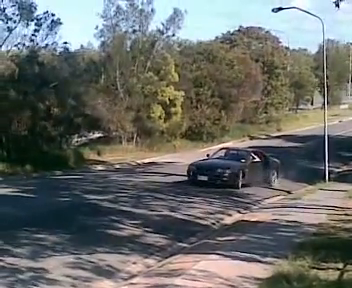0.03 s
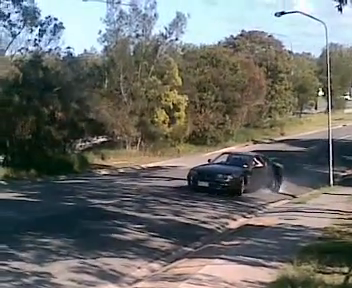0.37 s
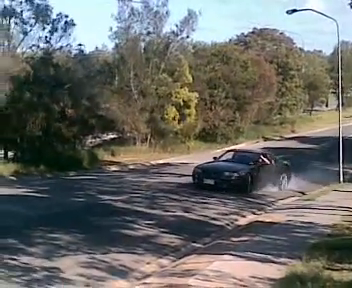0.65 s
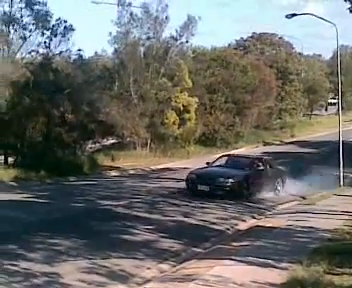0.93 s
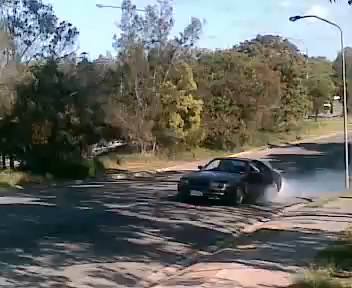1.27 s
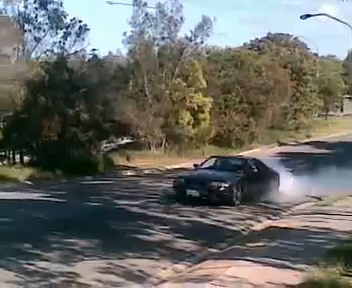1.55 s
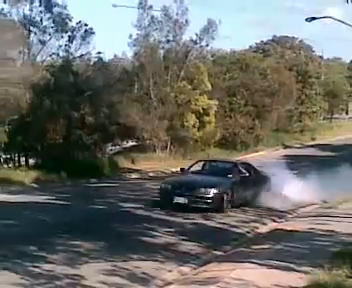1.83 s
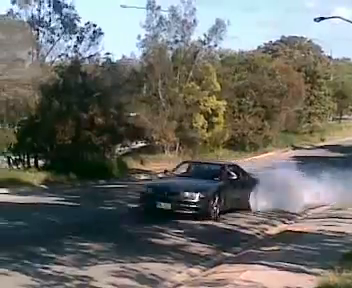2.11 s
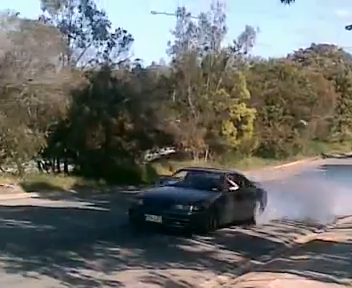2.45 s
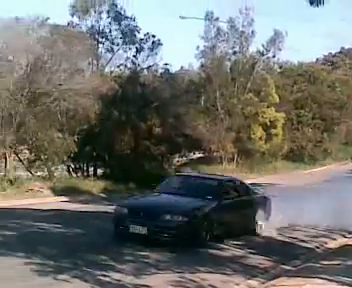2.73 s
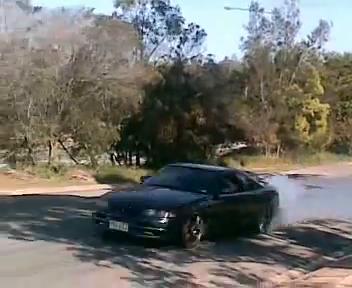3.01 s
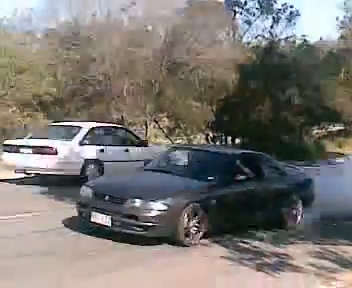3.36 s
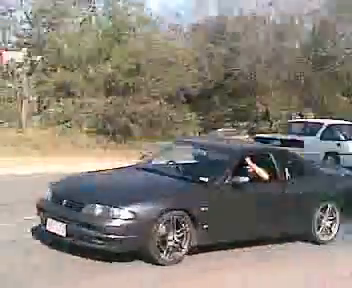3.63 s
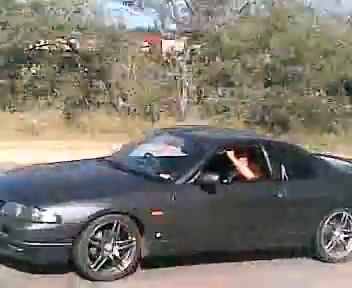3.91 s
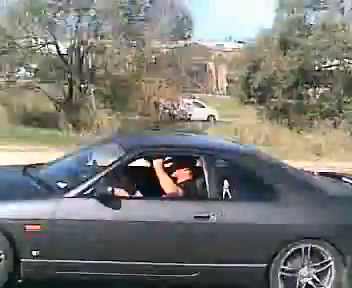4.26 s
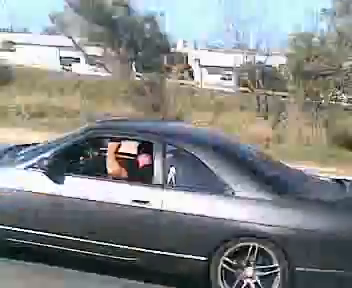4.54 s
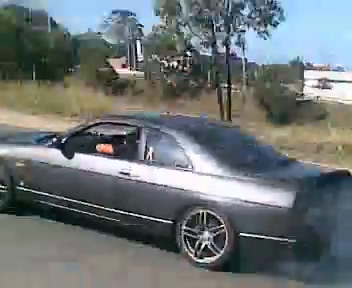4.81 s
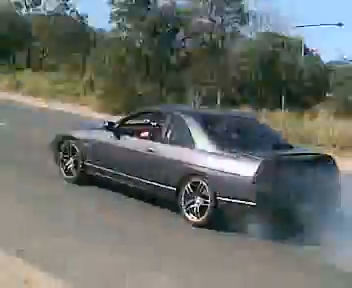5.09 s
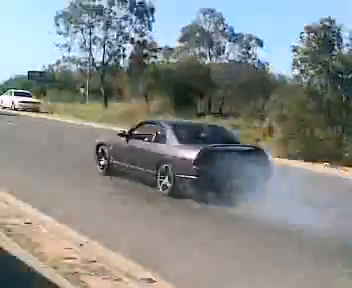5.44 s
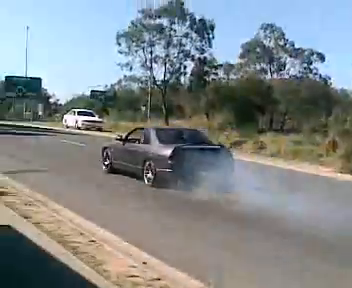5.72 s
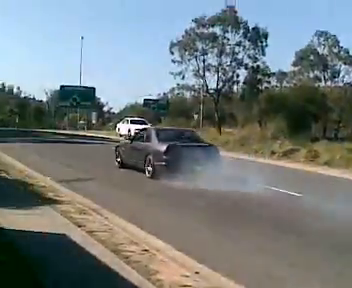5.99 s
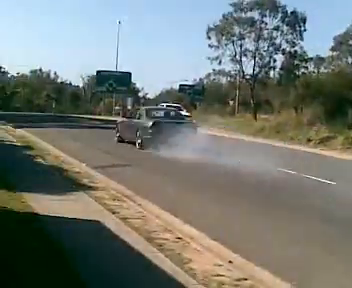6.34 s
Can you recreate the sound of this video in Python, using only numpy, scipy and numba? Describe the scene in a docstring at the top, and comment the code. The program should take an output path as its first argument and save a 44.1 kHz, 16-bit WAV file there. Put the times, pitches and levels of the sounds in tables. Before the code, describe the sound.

A car does a burnout, rasping against its rev limiter, then approaches on squealing tyres, blasts past the microphone and coasts away.

```python
"""A tree-lined road, microphone at the kerb. Some way off, a six-cylinder coupe does a burnout: the
exhaust rasps through its pipe and bangs on the rev limiter while the slipping tyres scrub and ring.
The driver lifts and the turbo vents; then the car pulls up to the microphone on squealing tyres.
From 4 s the turbulent blast of the tailpipe buffets and overloads the microphone as the car passes.
At 5.6 s the driver lifts again, the turbo vents once more, and the car coasts away with falling revs."""
import sys
import numpy as np
from scipy import signal
from scipy.fft import rfft, irfft
from scipy.io import wavfile
from scipy.ndimage import map_coordinates
from numba import njit

SR = 44100
rng = np.random.default_rng(int(sys.argv[2]) if len(sys.argv) > 2 else 0)


def store_pcm(level_fs):
    """Save levels as 16-bit WAV."""
    pcm = np.round(np.clip(level_fs, -1, 1) * 32767).astype(np.int16)
    wavfile.write(sys.argv[1], SR, np.atleast_2d(pcm).T)


N = 289296
T = np.arange(N) / SR
LIFT_OFF_S = 5.56

# Loudness of engine and tyre scrub: swells on the approach, ducks under the blast, returns, fades.
# Each row: time in seconds, apparent distance in metres.
APPARENT_DISTANCE = [(0, 16.5), (1.8, 18.1), (2.5, 17.8), (2.95, 12.9), (3.5, 7.4), (3.95, 5.4), (4.6, 17),
                     (5.4, 10.5), (5.85, 6.3), (6.56, 27)]
# Rubber scrubbing on asphalt. Each row: frequency in Hz, relative spectral level in dB.
SCRUB_SPECTRUM = [(25, -23), (70, -11.5), (170, -15), (420, -6.5), (700, -5), (950, -7.5), (1400, -4),
                  (2500, -8), (5000, -10.5), (7500, -27)]
# Bands in which the spinning tyres ring. Each row: centre in Hz, nominal width in Hz, relative gain in dB.
TREAD_BANDS = [(1346, 70, -1), (1720, 170, -4.5), (1810, 59, -9.5), (2870, 71, -7.5), (3680, 80, -4.5),
               (4244, 210, 2.5)]
# Strength of that ringing. Each row: time in seconds, level in dB.
TREAD_RING_LEVEL = [(0, -34), (.45, -36.5), (1.2, -33), (1.78, -28), (1.89, -46), (1.95, -36.5),
                    (2.07, -35), (2.14, -68), (2.34, -50), (2.38, -30), (2.6, -26.5), (2.9, -28),
                    (3.3, -34), (3.6, -29), (5.5, -31.5), (5.7, -56)]
# Tyre squeals. Each row: start and end in seconds, first and last pitch in Hz, level in dB,
# wobble as a share of the pitch.
TYRE_SQUEALS = [(0, 0.096, 1720, 1700, -27, 0.019), (1.845, 1.864, 760, 740, -33, 0.017),
                (1.897, 1.92, 620, 608, -25.5, 0.021), (2.36, 2.972, 1394, 1357, -27, .012),
                (2.7, 3.05, 2890, 2944, -30.5, .012), (2.8, 3.026, 1313, 1288, -21, 0.0118),
                (2.9, 3.353, 1630, 1670, -23.5, .018), (3.06, 3.622, 2294, 2335, -23, .025),
                (3.05, 3.33, 4250, 4290, -23.5, .019), (2.74, 3.321, 884, 920, -24.5, .05),
                (3.298, 4.137, 1450, 1494, -28, 0.0253), (3.5, 3.994, 5610, 6100, -32, .025),
                (5.54, 5.61, 2200, 1900, -33, 0.019), (5.6, 5.68, 1305, 1270, -29, .015),
                (5.715, 5.754, 828, 820, -28, 0.045), (5.71, 5.85, 2640, 2137, -35, 0.043)]
# The turbo vents after each lift. Each row: start, hold and decay in seconds, level in dB.
TURBO_VENTS = [(1.92, 0.13, 0.051, -26.5), (5.702, 0.017, 0.27, -25)]
# Hiss of the escaping boost. Each row: frequency in Hz, relative spectral level in dB.
VENT_SPECTRUM = [(200, -8), (700, -2.5), (1400, 4.5), (2400, 3.5), (3150, -4), (4300, -5.5), (6000, -3.5),
                 (7500, -2)]
# Presses of the throttle. Each row: start and end in seconds, opening 0-1, roughness of the rasp 0-1.
THROTTLE_PRESSES = [(-1, 1.81, 1, .88), (2.16, 2.35, .28, .5), (2.358, 5.57, 1, .62)]
# Engine speed until it coasts. Each row: time in seconds, four-stroke cycles per second.
ENGINE_SPEED = [(0, 60.5), (1.77, 60.7), (1.87, 56.5), (2.15, 52.0), (2.33, 59.4), (2.4, 55.6),
                (2.52, 53.5), (2.68, 55.2), (2.92, 60.4), (3.26, 60.3), (3.36, 58.3), (3.8, 57.8),
                (4.15, 60.0), (5.3, 56.0), (5.62, 53.6)]
# Rev limiter. Each row: relight time and length of the cut before it in seconds, bang in relative dB.
IGNITION_CUTS = [(0.254, 0.036, -17.5), (0.39, 0.11, -51), (0.458, 0.055, -15), (0.567, 0.0088, -19),
                 (0.613, 0.011, -22), (0.712, 0.03, -21), (0.782, 0.018, -19.5), (0.854, 0.051, -18),
                 (0.94, 0.024, -27), (0.997, 0.011, -30), (1.103, 0.037, -16.5), (1.159, 0.028, -21),
                 (1.249, 0.038, -20.5), (1.363, 0.0088, -18), (1.491, 0.032, -13), (1.574, 0.04, -14.5),
                 (1.664, 0.022, -18), (1.732, 0.037, -15.5), (1.811, 0.024, -22), (2.364, 0.015, -12),
                 (2.911, 0.016, -26), (3.046, 0.01, -17), (3.152, 0.011, -12.5), (3.25, 0.0086, -13),
                 (3.322, 0.021, -13.5)]
# Tailpipe thumps and outdoor rumble. Each row: frequency in Hz, relative spectral level in dB.
THUMP_SPECTRUM = [(25, -24), (72, 3), (110, -3.5), (190, 3), (280, -4), (450, -17), (1200, -6),
                  (4000, -50.5)]
# Orders that swell and fade as the car coasts away. Each row: multiple of the cycle rate,
# peak time and half width in seconds, level in dB.
COASTING_ORDERS = [(2, 5.8, 0.72, -45), (4, 6.22, 0.71, -45), (6, 5.64, 0.25, -31), (6, 6.22, 0.48, -51),
                   (8, 5.69, 0.16, -35), (10, 5.88, 0.24, -42.5), (10, 6.32, .12, -51), (12, 5.7, .13, -42),
                   (12, 6.17, 0.16, -42)]
# Orders around the firing tones, under load. Each row: multiple of the cycle rate, relative level in dB.
UNEVEN_ORDERS = [(2, -3.5), (3, -1), (4, 0), (5, -3.5), (7, -3.5), (8, -2.5), (9, -2.5), (10, -0.5),
                 (11, -11), (13, -8), (14, -2.5), (15, -0.5), (16, 0.5), (17, 2), (18, 2.5), (20, -0.5),
                 (22, -2.5), (24, 9), (25, -3.5), (26, 7), (28, 3.5), (30, 0), (34, -0.5)]
# Low pipe resonances where those orders drone. Each row: centre in Hz, half width in Hz, boost in dB.
PIPE_DRONES = [(159.2, 10, 10), (214, 13, 6), (600, 14, 7)]
# Silencer resonances where the firing tones boom. Each row: centre in Hz, half width in Hz, boost in dB.
SILENCER_BOOMS = [(352.6, 22.7, 8), (652.7, 30.7, 15), (702, 31, 12)]
# Bands that the silencer cancels. Each row: centre in Hz, width in Hz, gain in dB.
SILENCER_NULLS = [(453, 120, -16), (880, 230, -11.5), (2124, 97, -4)]
# Exhaust and body resonances. Each row: centre in Hz, width in Hz, relative gain in dB.
PIPE_MODES = [(579, 70, 8), (742, 59, 10), (1060, 55, 9.5), (1364, 170, 8.5), (1700, 172, 8.5),
              (2223, 114, 3), (2830, 350, -4.5), (3776, 290, -6), (4287, 300, -2.5), (5390, 2070, -8.5),
              (7120, 510, -8.5)]
# Cylinders in firing order. Each row: relative pulse level in dB, lateness as a share of the cycle.
CYLINDER_PULSES = [(-9.5, -0.0033), (-14, 0.0014), (-5, -0.008), (-9.5, -0.00026), (-11.5, -0.0065),
                   (-10.5, .002)]
# The body shades the treble as the car turns side-on. Each row: time in seconds, treble gain in dB.
RASP_TREBLE = [(0, 1.5), (1.7, 3), (2.7, 13.5), (3.2, 13), (3.9, 13.5), (5.6, 10), (6.56, -6)]
# Blast while the tailpipe faces the microphone. Each row: time in seconds, level in dB, centre in Hz.
BLAST_CURVE = [(4.0, -3.5, 1505), (5.05, -2, 1974), (5.5, -3.5, 1740)]
# Rumble within the blast. Each row: frequency in Hz, relative spectral level in dB.
RUMBLE_SPECTRUM = [(20, -2), (60, -5), (150, -4), (400, -4), (900, -4), (3000, -21)]
# Buffets of exhaust gas on the microphone. Each row: time in seconds, drop of the blast in octaves,
# push on the diaphragm 0-1.
GAS_BUFFETS = [(4.039, 1.98, 0), (4.204, 1.4, 0.2), (4.494, 2.2, 0.1), (4.642, 2.1, 0.65), (4.662, 2, 0.2),
               (4.8, 0.55, 0.35), (4.846, 0.97, 0), (4.921, 2.0, 0.82), (4.936, 0.12, 1), (5.053, 1.8, 0.1),
               (5.066, 3.1, 0.88), (5.252, 2.7, 0.43), (5.315, 0.15, 0.44), (5.331, 1.9, 0),
               (5.388, 2.72, 0.11), (5.429, 1.62, 0.06), (5.521, 0.78, 0.2), (5.538, 2.3, 0.16),
               (5.551, 2.4, 0), (5.566, 2.2, 0.33)]


def from_db(db):
    """Decibels to gain."""
    return 10 ** (np.asarray(db) / 20)


def rms_one(x):
    """Scale to unit rms."""
    return x / np.sqrt(np.mean(x ** 2) + 1e-20)


def in_time(rows):
    """Each column of a curve, at every sample."""
    times, *columns = np.transpose(rows)
    return [np.interp(T, times, column) for column in columns]


def gate(start, end, attack_s, release_s):
    """Envelope 0-1: attack from start, hold, release from end."""
    attack = 1 - np.exp(-np.maximum(T - start, 0) / attack_s)
    return attack * np.exp(-np.maximum(T - end, 0) / release_s)


def bell(x, centre, half_width):
    """Smooth hump of height 1."""
    return np.exp(-((x - centre) / half_width) ** 2)


def butter(x, hz, kind, order=2):
    """Causal low- or high-pass."""
    return signal.sosfilt(signal.butter(order, hz, kind, fs=SR, output="sos"), x)


def drift(rate):
    """Smooth random curve of rms 1, changing about rate times a second."""
    knots = rng.standard_normal(4000)
    coarse = T[::8]
    curve = map_coordinates(knots, [coarse * rate + 5], order=3, mode="wrap")
    return rms_one(np.interp(T, coarse, curve))


def noise(spectrum):
    """Noise with a given spectrum, rms 1."""
    hz, db = np.transpose(spectrum)
    bins = np.maximum(np.fft.rfftfreq(N, 1 / SR), 1)
    gain = from_db(np.interp(np.log(bins), np.log(hz), db))
    return rms_one(irfft(rfft(rng.standard_normal(N)) * gain, N))


def resonance(x, hz, width):
    """Two-pole resonance with gain 1 at its peak."""
    r = np.exp(-np.pi * width / SR)
    feedback = [1, -2 * r * np.cos(2 * np.pi * hz / SR), r * r]
    return signal.lfilter(np.array([1, 0, -1]) * (1 - r * r) / 2, feedback, x)


@njit
def moving_resonance(x, step, damping):
    """State-variable band-pass whose centre moves at every sample."""
    out, low, band = np.zeros(len(x)), 0., 0.
    for i in range(len(x)):
        low += step[i] * band
        band += step[i] * (x[i] - low - damping * band)
        out[i] = band
    return out


def order_tone(order, cycles, stumble):
    """A sine of rms 1 at a multiple of the cycle rate, its timing scattered by stumble cycles."""
    ragged = cycles + stumble * drift(70)
    return np.sqrt(2) * np.sin(2 * np.pi * (order * ragged + rng.random()))


def roadside_echo(x, echo_db=-5.0, t60_s=0.085):
    """Kerb, car body and trees add a short diffuse echo to the direct sound."""
    t = T[:SR // 2]
    echo = rng.standard_normal(len(t)) * from_db(-60 * t / t60_s) * (t > .002)
    return x + from_db(echo_db) * signal.fftconvolve(x, echo / np.linalg.norm(echo))[:N]


def rumble_and_thumps(bangs, load, thump_db=-13.0, load_db=-41.5, background_db=-46.0):
    """Over a faint, steady outdoor rumble, the tailpipe rumbles under load and thumps at each bang."""
    envelope = from_db(thump_db) * bangs ** 0.65 + from_db(load_db) * load + from_db(background_db)
    return envelope * noise(THUMP_SPECTRUM)


def tyre_scrub(near_db, shut, spinning_db=-31.5, rolling_change_db=-12.5):
    """Rubber scrubs on asphalt, louder as the car seems nearer and softer when merely rolling."""
    level_db = spinning_db + near_db + rolling_change_db * shut
    return from_db(level_db + 1.1 * drift(25)) * noise(SCRUB_SPECTRUM)


def tread_ring(firing, judder_db=3.0):
    """Slipping rubber rings in narrow bands, judders, and slackens in each ignition cut."""
    rings = np.zeros(N)
    for hz, width, db in TREAD_BANDS:
        band = resonance(rng.standard_normal(N), hz, 2 * width)
        rings += from_db(db) * rms_one(resonance(band, hz, 2 * width))
    level_db = in_time(TREAD_RING_LEVEL)[0] + judder_db * drift(60)
    return from_db(level_db) * firing ** 0.57 * rms_one(rings)


def tyre_squeals(firing, flutter_db=3.0, overtone_db=-15.0):
    """Sticking and slipping tread squeals at an unsteady pitch and dips in each ignition cut."""
    out = np.zeros(N)
    for start, end, first_hz, last_hz, db, wobble in TYRE_SQUEALS:
        glide_hz = np.interp(T, [start, end], [first_hz, last_hz])
        hz = glide_hz * (1 + wobble * (drift(330) + 0.21 * drift(10)))
        phase = 2 * np.pi * np.cumsum(hz) / SR
        tone = np.sin(phase) + from_db(overtone_db) * np.sin(2 * phase)
        swell = gate(start, end, attack_s=min(0.04, (end - start) / 4), release_s=0.01)
        out += from_db(db + flutter_db * drift(70)) * swell * firing * tone
    return out


def turbo_vent(attack_s=0.0035):
    """Trapped boost hisses out and dies away."""
    envelope = sum(from_db(db) * gate(start, start + hold_s, attack_s, decay_s)
                   for start, hold_s, decay_s, db in TURBO_VENTS)
    return envelope * noise(VENT_SPECTRUM)


def pedal(start, end):
    """One press of the throttle, easing open and shut."""
    return gate(start, end, attack_s=0.041, release_s=0.055)


def throttle(turbo_lag_s=0.12, coasting_rough=0.99):
    """How far the throttle is shut, how much boost the lagging turbo lacks, and roughness; all 0-1."""
    opening, rough = 0, coasting_rough
    for start, end, amount, press_rough in THROTTLE_PRESSES:
        pressed = pedal(start, end)
        opening += amount * pressed
        rough += (press_rough - coasting_rough) * pressed
    shut = 1 - np.clip(opening, 0, 1)
    no_boost = butter(shut, 1 / (2 * np.pi * turbo_lag_s), "low", order=1)
    return shut, no_boost, np.clip(rough, 0, 1)


def rev_limiter(cut_db=-12.5, bangs_db=-10.5, bang_hold_s=.013):
    """Firing strength, which sags in each cut, and the envelope of the unburnt fuel banging after it."""
    cut, bangs = np.zeros(N), np.zeros(N)
    for relight, length_s, db in IGNITION_CUTS:
        cut += gate(relight - length_s, relight, attack_s=0.012, release_s=.005)
        bang = gate(relight, relight + bang_hold_s, attack_s=.003, release_s=.01)
        bangs += from_db(bangs_db + db) * bang
    return from_db(cut_db * cut), bangs


def crank(firing, unsteady=.0015, sag=.012, coast_down_s=2.17):
    """Cycle rate and cycles turned; the crank lags in each ignition cut and runs down at the end."""
    run_down = np.exp(-np.maximum(T - ENGINE_SPEED[-1][0], 0) / coast_down_s)
    cycle_hz = in_time(ENGINE_SPEED)[0] * run_down
    starved = butter(1 - firing, 6, "low", order=1)
    cycles = np.cumsum(cycle_hz * (1 + unsteady * drift(30) - sag * starved)) / SR
    return cycle_hz, cycles


def coasting_note(cycles, flutter_db=2.5):
    """Off the throttle the engine burbles; as the car recedes, a few orders stand out at a time, each swelling
    and fading in turn."""
    out = np.zeros(N)
    for order, peak_s, half_width_s, db in COASTING_ORDERS:
        swell = from_db(db + flutter_db * drift(55)) * bell(T, peak_s, half_width_s)
        out += swell * order_tone(order, cycles, stumble=0.0063)
    return out * (T > LIFT_OFF_S)


def exhaust_note(cycles, cycle_hz, firing, near_db, shut, uneven_db=-39.0, shut_db=-9.5):
    """Six firings a cycle give a tone and its octave; uneven cylinders put other orders around them."""
    def boost_db(order, resonances):
        return sum(db * bell(order * cycle_hz, hz, half_width) for hz, half_width, db in resonances)
    stumble = .003 + .012 * shut
    firing_order = len(CYLINDER_PULSES)
    firing_db = -35.0
    octave_db = -38.5 - 13 * bell(T, 3.78, 0.051)  # fades briefly on the approach
    out = np.zeros(N)
    # The firing tones and the high orders grow fastest as the car seems nearer.
    for order, db in (firing_order, firing_db), (2 * firing_order, octave_db):
        boom_db = (1 - 0.25 * shut) * boost_db(order, SILENCER_BOOMS)
        flutter_db = 1.1 * drift(40)
        out += from_db(db + boom_db + 1.6 * near_db + flutter_db) * order_tone(order, cycles, stumble)
    for order, db in UNEVEN_ORDERS:
        level_db = uneven_db + db + boost_db(order, PIPE_DRONES) + (1 + 0.041 * order) * near_db
        burble_db = 3.0 * drift(9) + 2.5 * drift(60)
        out += from_db(level_db + burble_db) * order_tone(order, cycles, stumble)
    return out * pedal(-1, LIFT_OFF_S) * firing ** 0.6 * from_db(shut_db * shut)


def exhaust_pipe(x):
    """The silencer cancels some bands, then pipe and body ring; rms 1."""
    for hz, width, db in SILENCER_NULLS:
        x = x - (1 - from_db(db)) * resonance(x, hz, width)
    return rms_one(sum((-1) ** k * from_db(db) * resonance(x, hz, width)
                       for k, (hz, width, db) in enumerate(PIPE_MODES)))


def pressure_fronts(cycles, jitter_s=.00017, scatter_db=3.0, max_cycles=450):
    """Each cylinder sends out one sharp front a cycle, scattered in timing and strength."""
    fronts = np.zeros(N)
    for k, (pulse_db, late) in enumerate(CYLINDER_PULSES):
        timing, strength = rng.standard_normal((max_cycles, 2)).T
        due = np.arange(max_cycles) + k / len(CYLINDER_PULSES) + late
        at = np.interp(due, cycles, np.arange(N)) + jitter_s * SR * timing
        heard = (at > 0) & (at < N - 100)
        fronts[at[heard].astype(int)] += from_db(pulse_db + scatter_db * strength[heard])
    return butter(butter(fronts, 1020, "high", order=4), 2300, "low", order=1)


def exhaust_rasp(cycles, firing, bangs, near_db, shut, no_boost, rough,
                 base_db=-22, shut_db=-12.5, no_boost_db=-12.5, treble_shut_db=-2):
    """Each firing sends a front and a puff of turbulence down the pipe; bangs add bursts of gas noise."""
    fronts = exhaust_pipe(pressure_fronts(cycles))
    phase = 2 * np.pi * cycles
    puffing = 1 + 0.25 * np.cos(len(CYLINDER_PULSES) * phase) + 0.17 * np.cos(phase)
    gas = exhaust_pipe(rng.standard_normal(N) * puffing)
    level_db = base_db + near_db + shut_db * shut + no_boost_db * no_boost + drift(45)
    blend = np.sqrt(1 - rough ** 2) * fronts + rough * gas
    rasp = from_db(level_db) * firing * blend + bangs * gas
    dull = butter(rasp, 7000, "low", order=1)
    treble_db = in_time(RASP_TREBLE)[0] + treble_shut_db * shut
    return dull + from_db(treble_db) * (rasp - dull)


def exhaust_blast(start_s=3.982, wander_octaves=.2, damping=0.6, buffet_db_per_octave=3.5,
                  hiss_db=-22.5, rumble_db=-1.0, lull_db=-29):
    """Turbulent roar straight at the microphone, with shreds of hiss; buffets drag it lower and louder."""
    level_db, centre_hz = in_time(BLAST_CURVE)
    # Each buffet builds more slowly than it lets go.
    drop = np.max([octaves * bell(T, peak_s, np.where(T < peak_s, 0.0095, 0.0021))
                   for peak_s, octaves, _ in GAS_BUFFETS], axis=0)
    hz = np.clip(centre_hz * 2 ** (wander_octaves * drift(600) - drop), 100, 3500)
    step = 2 * np.sin(np.pi * hz / SR)
    band = moving_resonance(rng.standard_normal(N), step, damping)
    band = moving_resonance(band, step, damping) / np.sqrt(step)  # even power as the centre moves
    roar = from_db(buffet_db_per_octave * drop) * rms_one(butter(band, 3000, "low", order=4))
    shreds = from_db(hiss_db + 8 * drift(160))
    hiss = shreds * rms_one(resonance(rng.standard_normal(N), hz=6100, width=2900))
    rumble = from_db(rumble_db) * noise(RUMBLE_SPECTRUM)
    blowing = gate(start_s, LIFT_OFF_S, attack_s=0.0057, release_s=0.017)
    lull = gate(5.424, 5.466, attack_s=0.015, release_s=0.003)  # drops out once near the end
    return blowing * from_db(level_db + lull_db * lull) * (roar + hiss + rumble)


def buffeted_diaphragm(x, pinned_db=-13.0, shove=1.8, half_width_s=0.0077, leak_hz=42):
    """A hard buffet pins the diaphragm to one side and deafens it; the steady pressure leaks away."""
    pushes = sum(push * np.exp(-((T - peak_s) / half_width_s) ** 4) for peak_s, _, push in GAS_BUFFETS)
    pinned = np.minimum(pushes, 1)
    return butter(x * from_db(pinned_db * pinned) - shove * pinned, leak_hz, "high")


def scene(reference_m=10):
    """The car as heard from the kerb, alike in both channels."""
    near_db = 20 * np.log10(reference_m / in_time(APPARENT_DISTANCE)[0])
    shut, no_boost, rough = throttle()
    firing, bangs = rev_limiter()
    cycle_hz, cycles = crank(firing)
    note = exhaust_note(cycles, cycle_hz, firing, near_db, shut)
    rasp = exhaust_rasp(cycles, firing, bangs, near_db, shut, no_boost, rough)
    tyres = tyre_scrub(near_db, shut) + tyre_squeals(firing) + tread_ring(firing)
    mix = tyres + roadside_echo(rasp + turbo_vent()) + note + coasting_note(cycles)
    mix += rumble_and_thumps(bangs, load=1 - shut) + exhaust_blast()
    return np.array([mix, mix])


def record(dry, clip_level=.61, hardness=7, cutoff_hz=7600):
    """The buffeted microphone saturates its input stage; two presence peaks follow and the top is lost."""
    pressure = butter(buffeted_diaphragm(dry), 7400, "low", order=16)
    clipped = pressure / (1 + np.abs(pressure / clip_level) ** hardness) ** (1 / hardness)
    presence = 0.023 * resonance(clipped, 3400, 550) + 0.5 * resonance(clipped, 5630, 570)
    return signal.sosfiltfilt(signal.butter(12, cutoff_hz, fs=SR, output="sos"), clipped + presence)


dry = scene()
out = record(dry)
store_pcm(out)
```